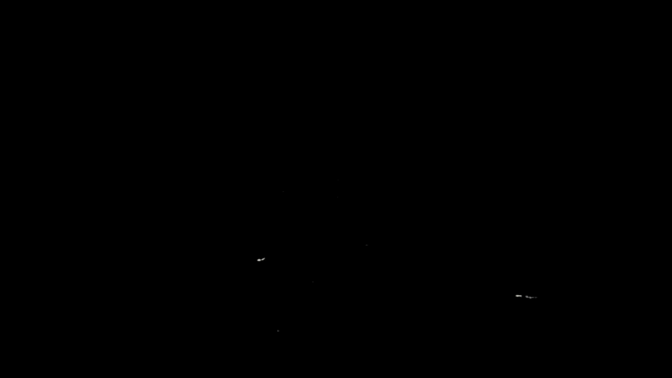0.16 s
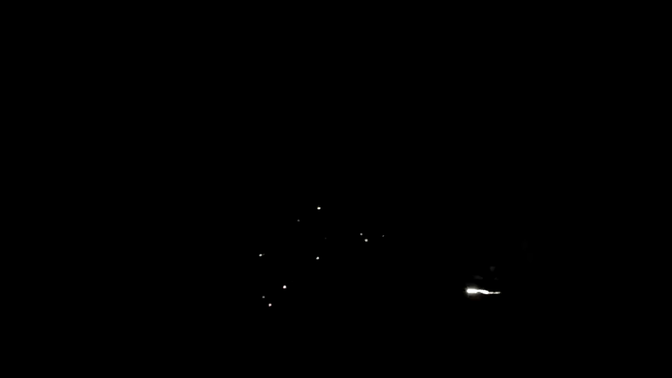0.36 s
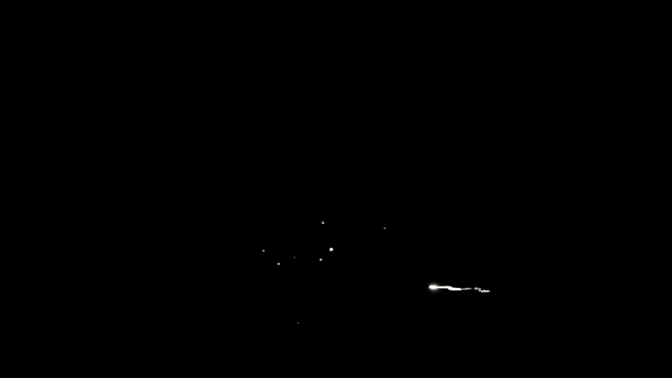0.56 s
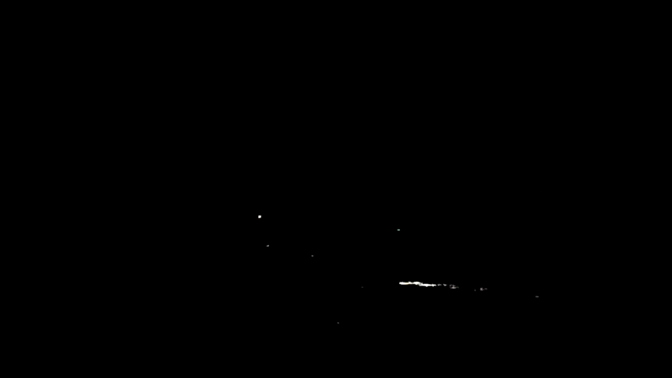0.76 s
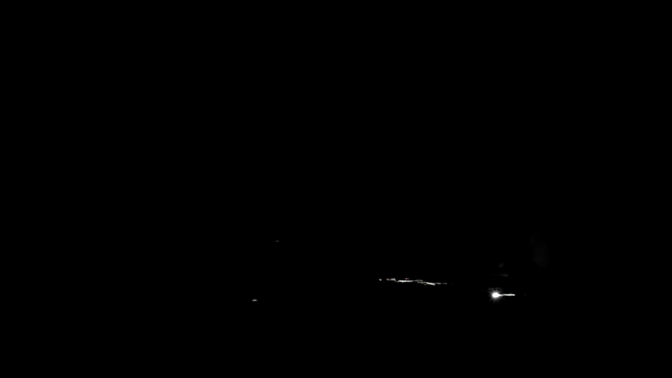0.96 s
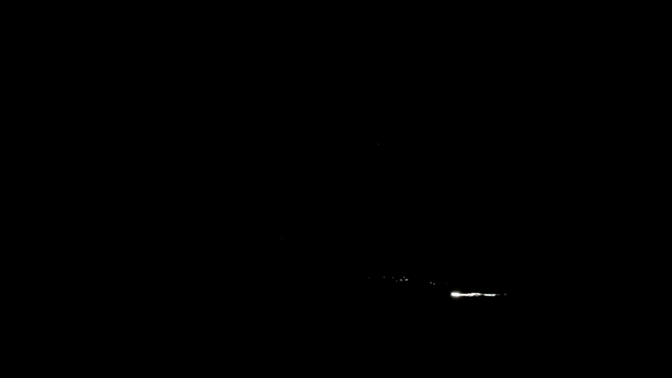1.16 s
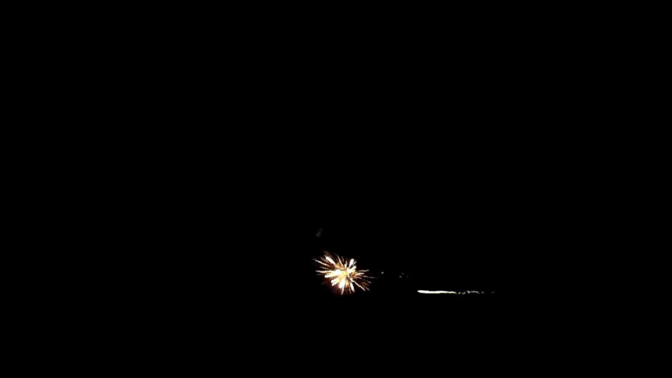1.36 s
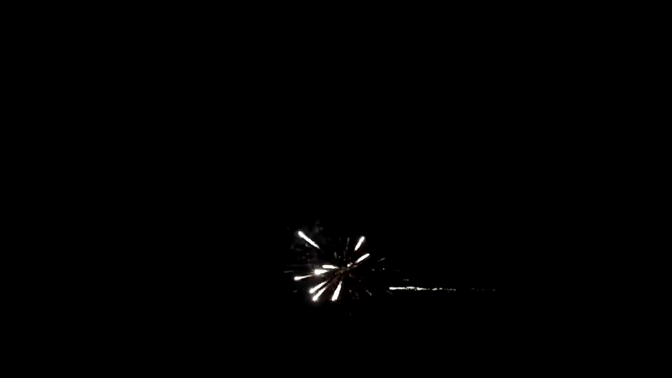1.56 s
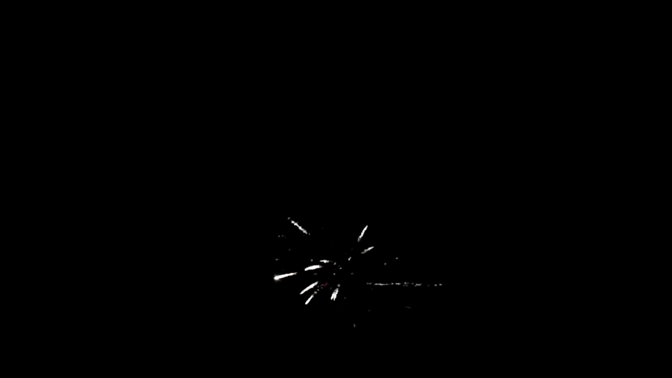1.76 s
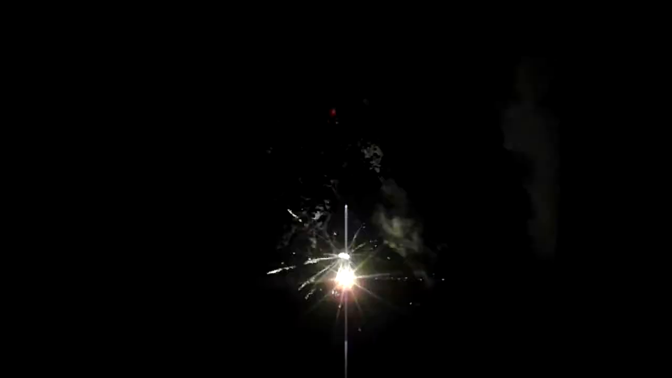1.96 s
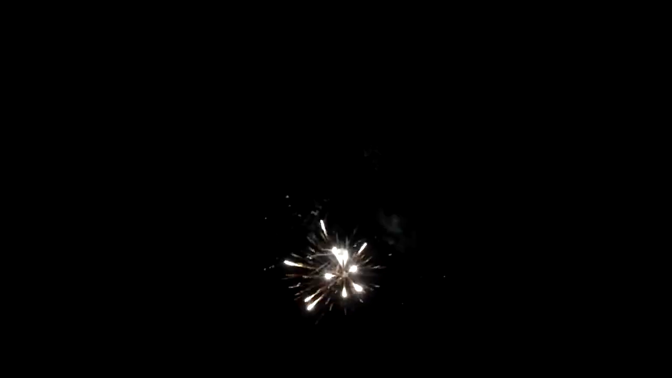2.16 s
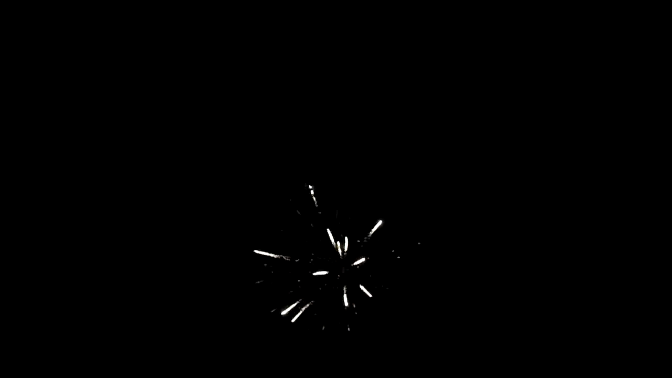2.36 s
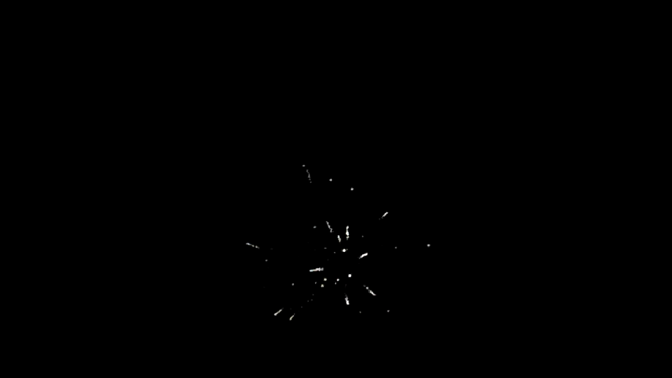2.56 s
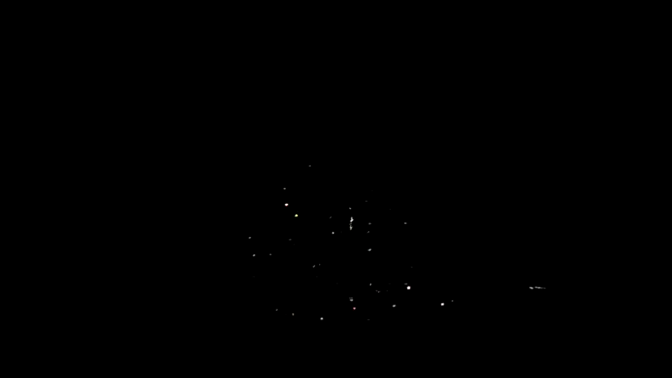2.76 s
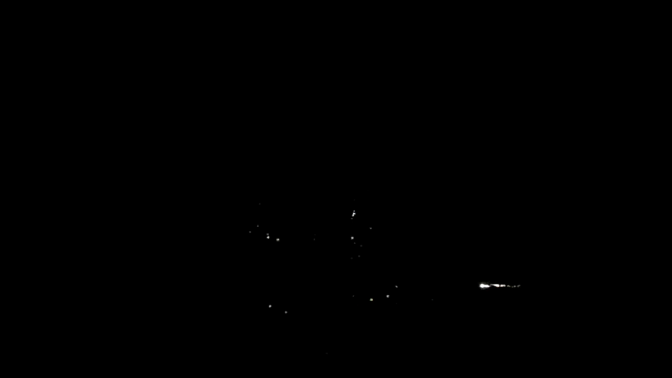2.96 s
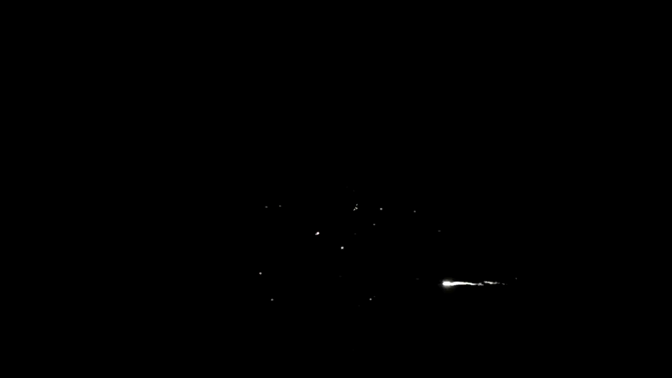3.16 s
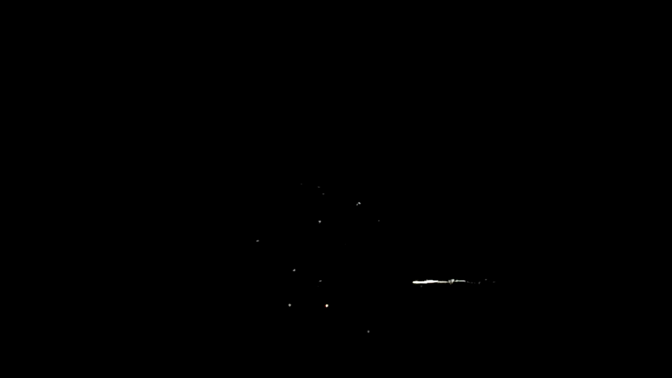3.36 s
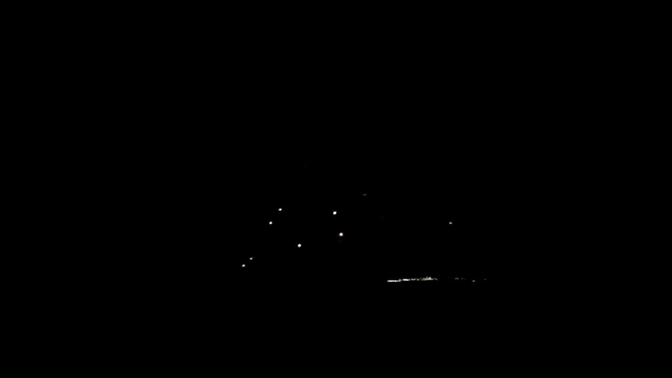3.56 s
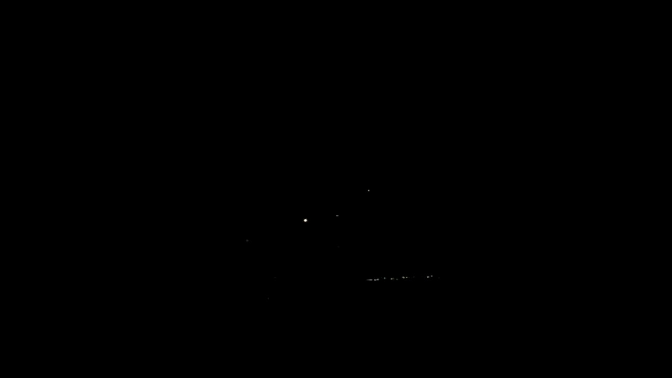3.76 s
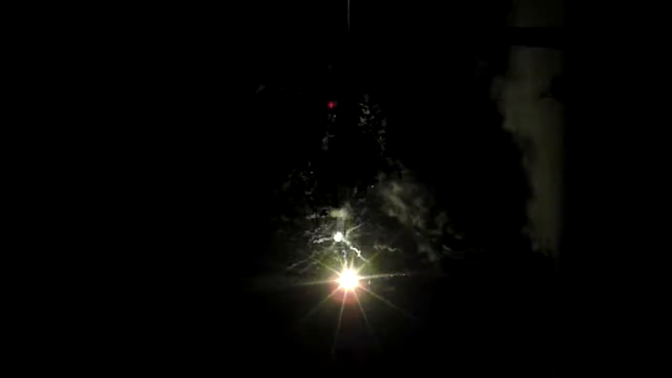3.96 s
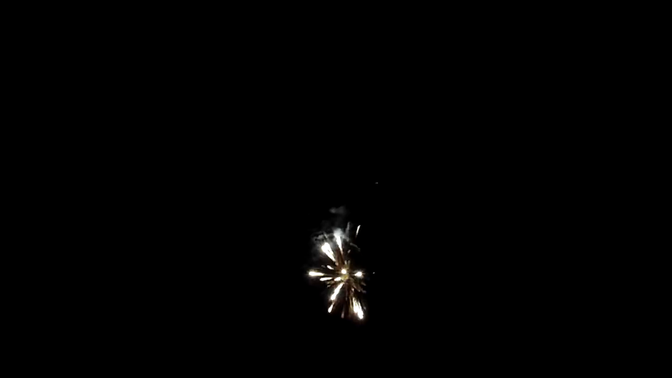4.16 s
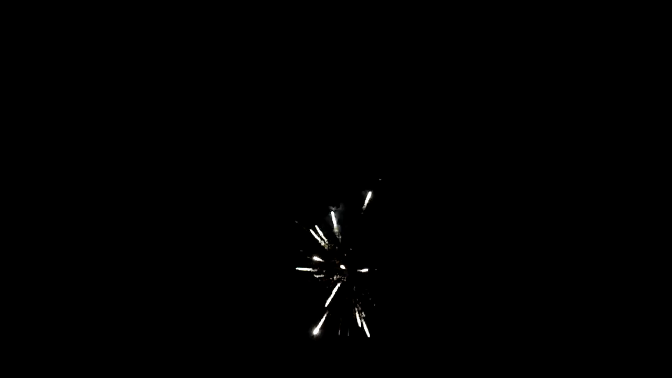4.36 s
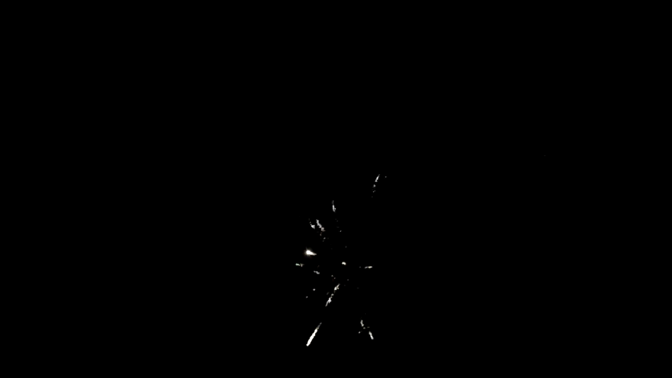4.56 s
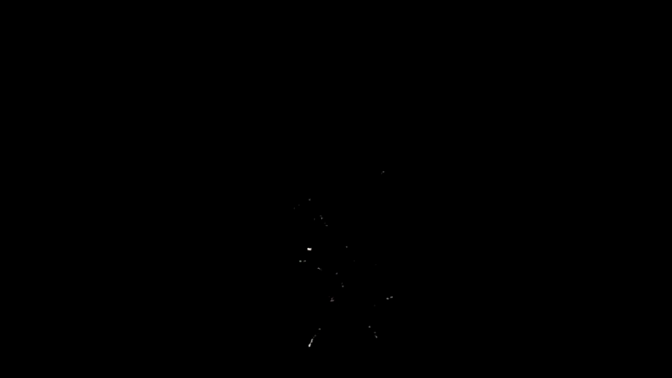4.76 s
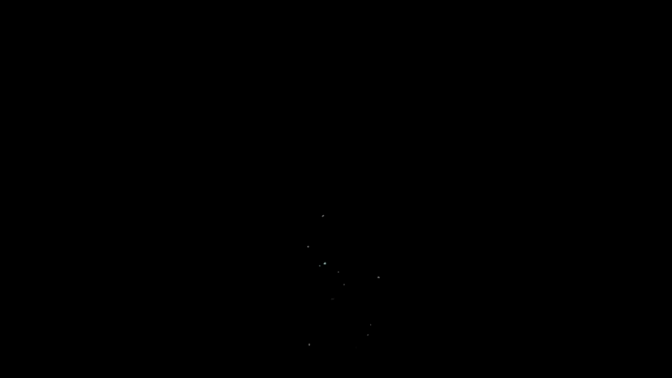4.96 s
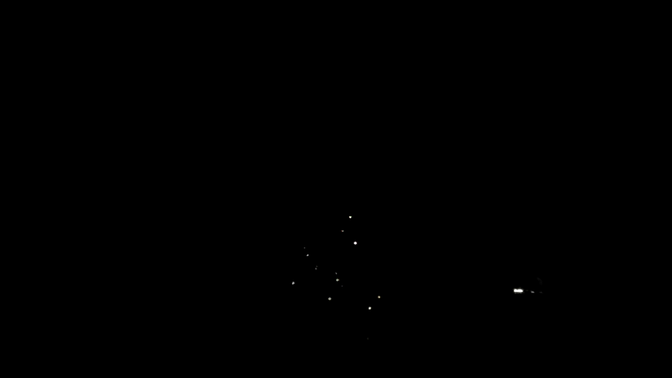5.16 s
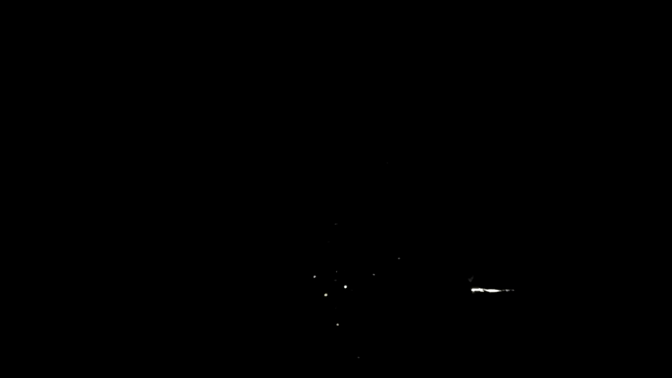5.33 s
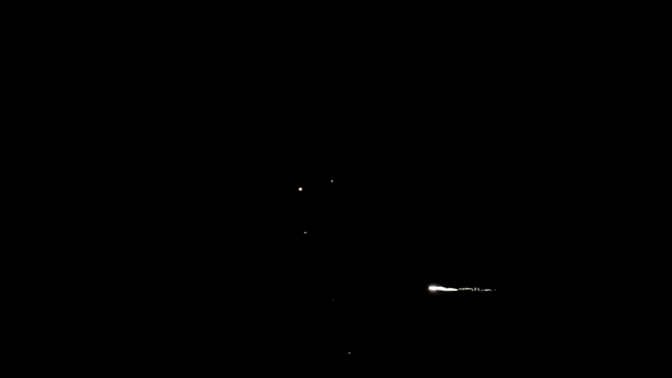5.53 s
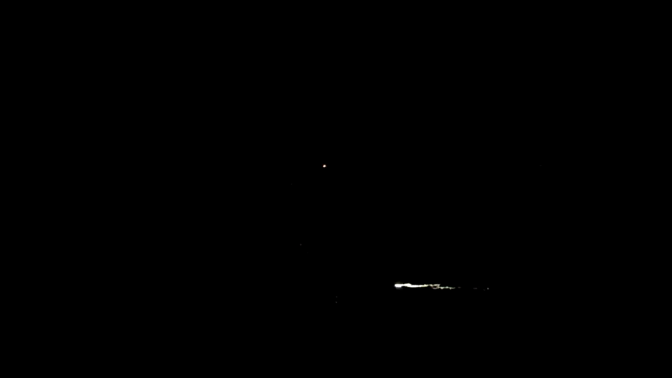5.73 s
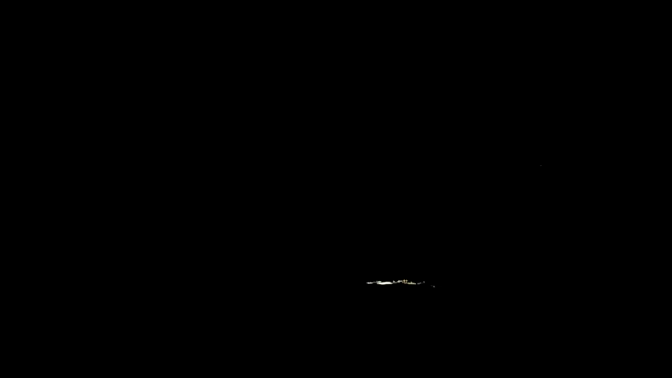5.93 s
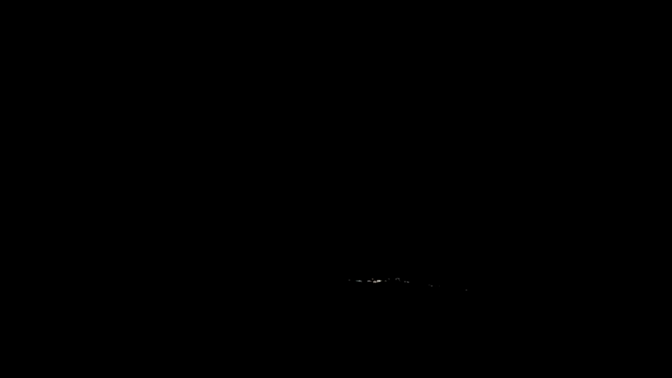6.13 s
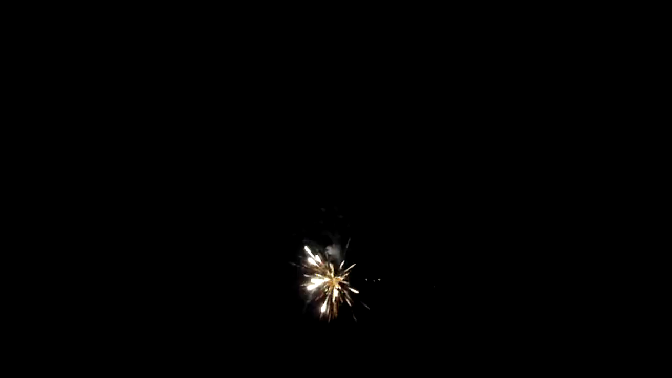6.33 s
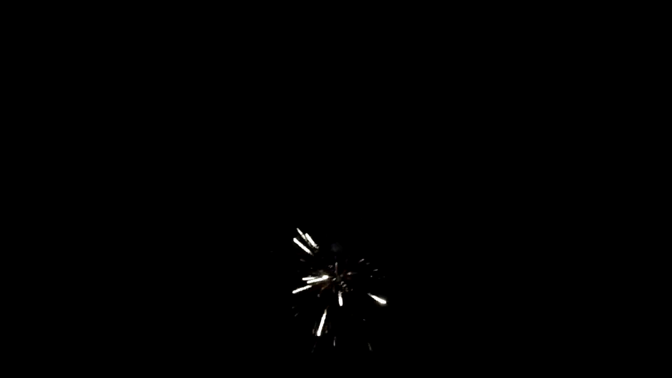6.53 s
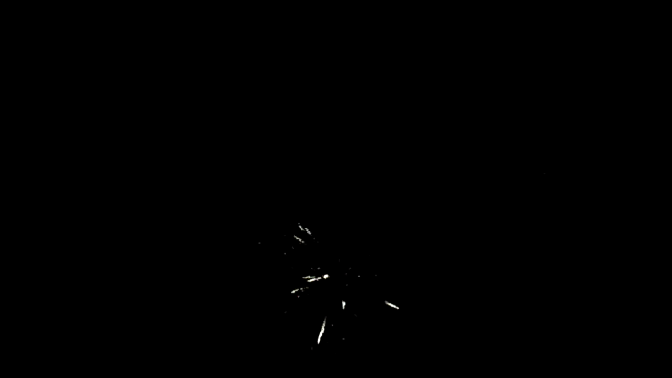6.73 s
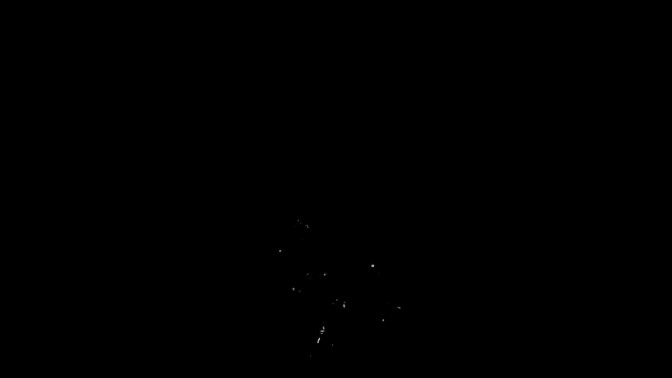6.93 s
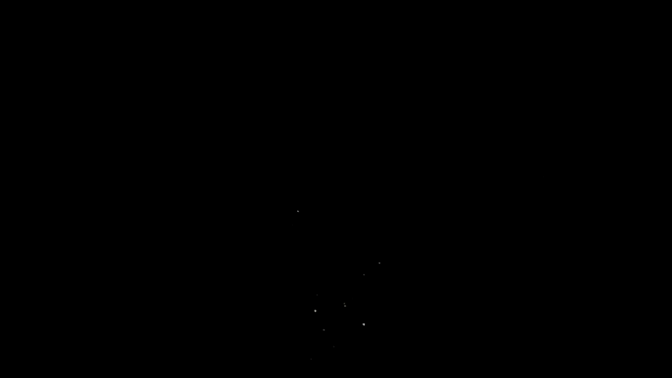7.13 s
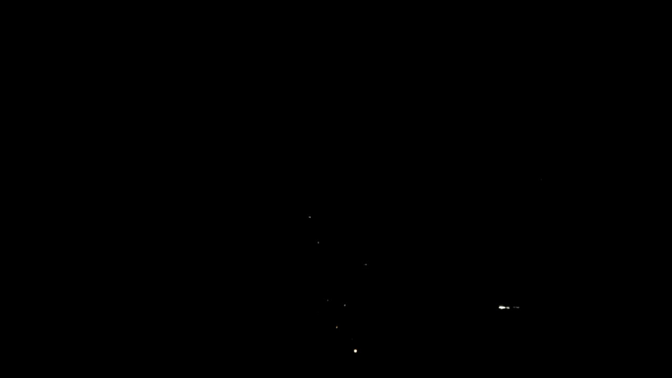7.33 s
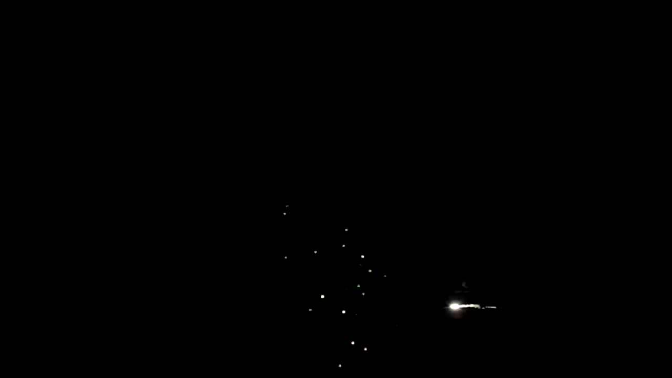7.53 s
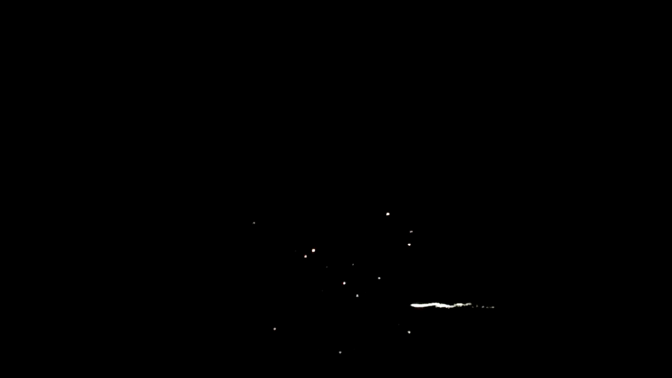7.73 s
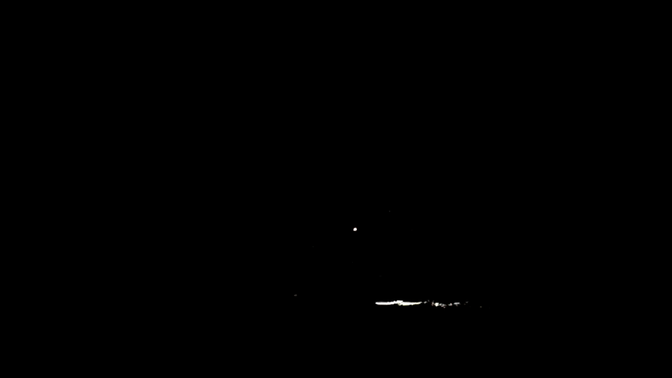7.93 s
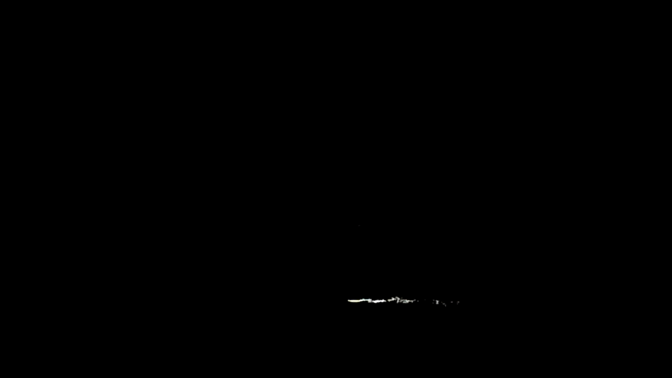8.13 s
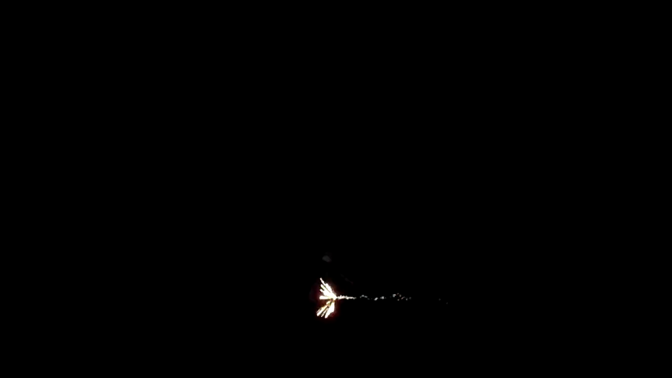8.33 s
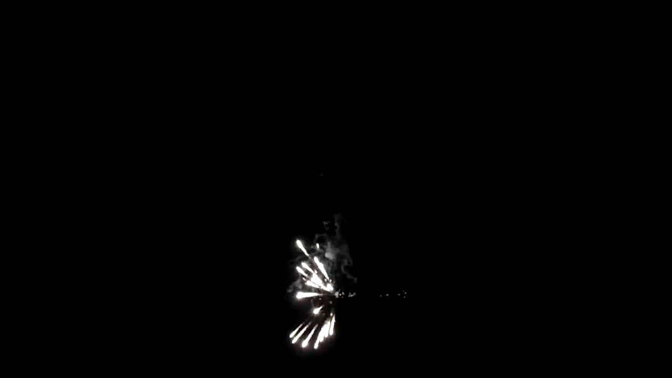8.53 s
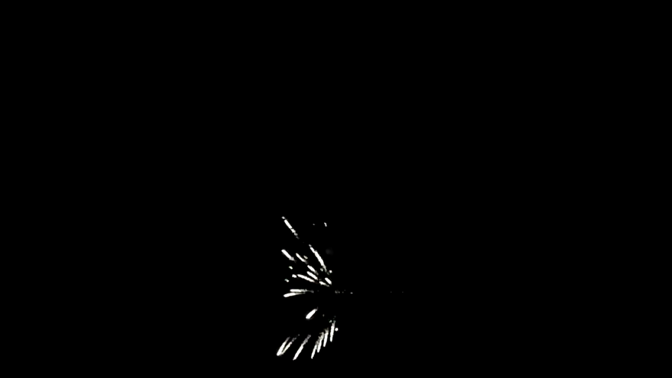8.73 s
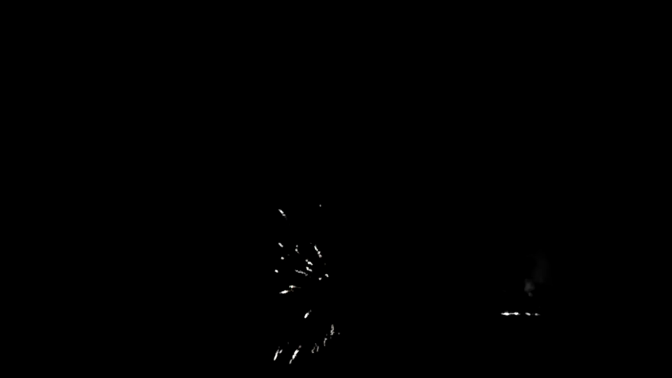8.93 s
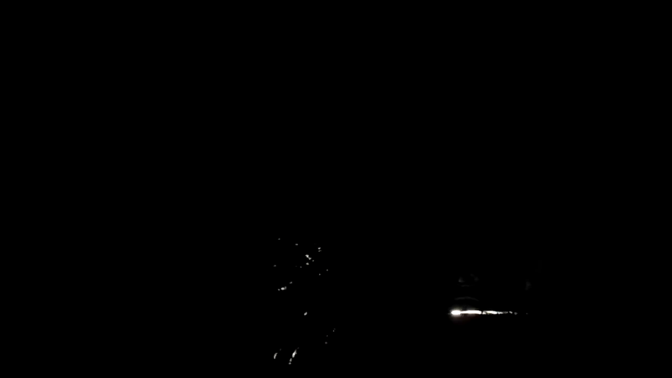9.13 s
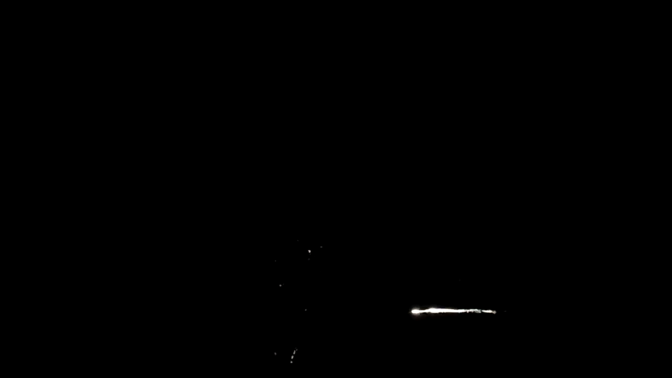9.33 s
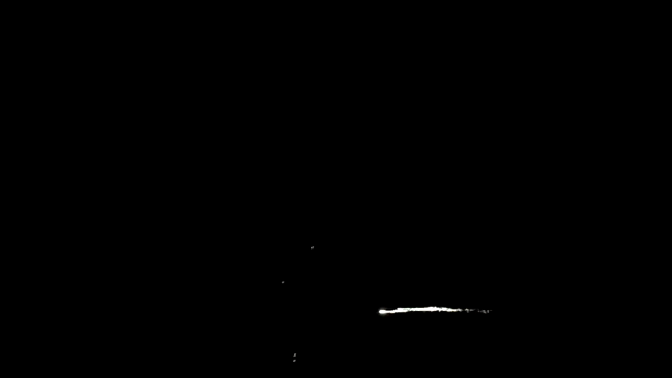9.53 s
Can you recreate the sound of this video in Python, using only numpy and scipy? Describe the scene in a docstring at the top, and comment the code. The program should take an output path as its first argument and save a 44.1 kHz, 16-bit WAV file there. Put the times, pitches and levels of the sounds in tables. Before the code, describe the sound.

A phone picks up a steady firework series: one bang almost at once, two dull launch thumps, two bangs close together, then thump and bang alternating to the end. The bangs are abrupt and overloaded, their echoes bright at first and then dull, lumpy and rolling. Single echoes knock back from buildings about a second later. Low traffic murmur and a faint early sizzle lie underneath, gated by noise suppression.

```python
"""Open ground ringed by far buildings, at night: firework shells, lobbed from a distant mortar, burst overhead.
Each blast is a sharp pressure push with nearby bounces that overloads a phone's microphones, then rolls back
from the surroundings for seconds as clumpy, dulling noise, with separate slaps off single buildings.
The mortar lifts are softer thumps with a crumble of scatter and a short tube ring. The phone's noise suppressor
shuts band after band, broadly treble first, as the rumble sinks toward murmur, a faint sizzle and hiss."""
import sys
import numpy as np
from scipy import signal
from scipy.io import wavfile
from scipy.ndimage import uniform_filter1d

SR = 44100
rng = np.random.default_rng(int(sys.argv[2]) if len(sys.argv) > 2 else 0)


def wav_out(sig):
    """Save sig, one row per channel (or a flat mono array), as 16-bit PCM at SR to the path in sys.argv[1]."""
    wavfile.write(sys.argv[1], SR, np.round(np.clip(np.atleast_2d(sig).T, -1, 1) * 32767).astype(np.int16))


N = 427322

# Shell bursts overhead. Each row: start in seconds, push level in dB before filtering, push length in ms,
# lateness of its slaps in ms, extra level of its slaps in dB, roll brightness in dB per octave above 1 kHz.
BURST_EVENTS = [(0.1364, 18, 0.89, 3.5, 0.5, 0.45), (2.391, 16, 0.81, 0.1, -9, 1),
                (3.088, 16.5, 0.69, -1.5, 0, -0.53), (5.0665, 17.5, 0.96, -2.5, 1.5, 0.2),
                (7.2997, 17.5, 0.98, 1.5, -4.5, 0.17), (9.379, 13.5, 0.95, 0.1, 0.1, 0.33)]
# Mortar lifts. Each row: start in seconds, relative level in dB, push length in ms,
# top of the scatter in Hz, tube ring in dB relative to the lift.
LIFT_EVENTS = [(1.166, -9, 0.45, 3600, -24), (1.8262, -9, 0.37, 2340, -44), (3.7598, -12, 0.59, 2570, -21),
               (6.1361, -11.5, 0.62, 3900, -15.5), (8.2561, -11, 1, 3440, -26)]
EARLIER_BURST_S = -1.76  # a burst before the start, of which only the echoes are heard


def undb(db):
    """Turn dB into an amplitude factor."""
    return 10 ** (np.asarray(db) / 20)


def shape(table, hz):
    """Read a table of (Hz, value) rows along a log-frequency axis."""
    f, value = np.transpose(table)
    return np.interp(np.log(np.maximum(hz, 1)), np.log(f), value)


def coloured(db_of, alike, size=512):
    """Two-channel noise whose dB per Hz follows db_of(Hz, s); alike is the share of power common to both sides."""
    common, own = rng.standard_normal(N), rng.standard_normal((2, N))
    alike = np.clip(alike, 0, 1)
    white = np.sqrt(alike) * common + np.sqrt(1 - alike) * own
    hz, s, z = signal.stft(white, SR, nperseg=size)
    z = z * undb(db_of(hz[:, None], s[None, :]))
    return np.sqrt(SR / 2) * signal.istft(z, SR, nperseg=size)[1][:, :N]


def walk(rate):
    """Random levels, a new one every 1 / rate s, joined by straight slews; spread a little under 1."""
    hold = int(SR / rate)
    steps = np.repeat(rng.standard_normal(N // hold + 1), hold)
    return 1.08 * uniform_filter1d(steps, hold)[:N]


def blast(s, push_ms, pull):
    """A sudden push of air that sinks through zero into a longer pull; the microphone reads it upside down."""
    t = np.maximum(s, 0) * 1000 / push_ms
    return (s >= 0) * (t - 1) * np.exp(-pull * t)


def bursts():
    """The blast arrives direct and again off the ground, a wall close by and the far side of the yard."""
    ground_s, wall_s, yard_s = 0.00205, 0.00415, 0.0113
    yard_db = -12
    out, t = np.zeros(N), np.arange(N) / SR
    for s, db, push, *_ in BURST_EVENTS:
        near = slice(int(s * SR) - 9, int(s * SR) + 2000)
        u = t[near] - s
        direct = blast(u, push, 0.91)
        ground = 2.2 * blast(u - ground_s, push, 1.18)
        wall = 1.37 * blast(u - wall_s, 2.6 * push, 2.55)
        yard = undb(yard_db) * blast(u - yard_s, 1.06 * push, 0.89)
        out[near] += undb(db) * (direct + ground + wall + yard)
    return signal.sosfilt(signal.butter(2, 2200, fs=SR, output="sos"), out)


def answer(age):
    """Power the surroundings send back, age s after a blast: a steady fade that swells at built-up stretches."""
    roll_db, roll_db_per_s = -33, -10.5
    # Each row: time after the blast in seconds, relative level in dB, rise in seconds, fall in seconds.
    swell_rows = [(0.36, -39, 0.099, 0.044), (0.59, -39, 0.019, 0.057), (0.9, -37, 0.1, 0.066),
                  (1.05, -43, 0.057, 0.053), (1.25, -45.5, 0.017, 0.086), (1.75, -44, 0.01, 0.16),
                  (2.05, -50.5, 0.16, 0.31)]
    power = undb(roll_db + roll_db_per_s * age) ** 2
    for s, db, rise, fall in swell_rows:
        width = np.where(age < s, rise, fall)
        power = power + undb(db) ** 2 * np.exp(-((age - s) / width) ** 2 / 2)
    return (age >= 0) * power


def roll():
    """Countless echoes: bright and strong from near things, duller as they come from further off."""
    # Echoes from near things. Each row: frequency in Hz, relative density in dB per Hz.
    near_colour = [(30, -37), (100, -18), (200, -20), (300, -31.5), (500, -24), (900, -34), (1400, -34.5),
                   (2000, -36.5), (3000, -39.5), (4500, -46), (7000, -54), (11500, -48.5)]
    # Far echoes, dulled by the long path through air. Each row: frequency in Hz, relative density in dB per Hz.
    far_colour = [(30, -32), (100, -34.5), (200, -28), (300, -32), (450, -25), (650, -26), (900, -32),
                  (1300, -36.5), (1800, -40.5), (2400, -45.5), (3000, -56), (4000, -58.5), (6000, -66),
                  (11500, -100)]
    # Pace of the change from near to far colour. Each row: frequency in Hz, time constant in seconds.
    ageing = [(100, 0.039), (300, 0.13), (2000, 0.9), (4000, 0.49), (9000, 0.63)]
    lift_roll_db = -18.5  # the lifts' roll relative to the bursts'

    t = np.arange(N) / SR
    starts = np.array([EARLIER_BURST_S] + [row[0] for row in BURST_EVENTS])
    bright = np.array([0] + [row[5] for row in BURST_EVENTS])

    def latest(s):
        return np.searchsorted(starts, s, "right") - 1

    def age(s):
        return s - starts[latest(s)]

    def echo_db(hz, s):
        young = np.exp(-age(s + 0.0049) / np.maximum(shape(ageing, hz), .02))
        colour = shape(far_colour, hz) + (shape(near_colour, hz) - shape(far_colour, hz)) * young
        # the air keeps eating treble on the longest paths
        air = 2.5 * hz / 1000 * np.clip(age(s) - .95, 0, .6)
        tilt = bright[latest(s)] * np.log2(np.maximum(hz, 1000) / 1000)
        return colour - air + tilt

    echoes = coloured(echo_db, 1.0)
    coarse = t[::64]
    burst_power = sum(answer(coarse - s) for s in starts)
    lift_power = undb(lift_roll_db) ** 2 * sum(answer(coarse - row[0]) for row in LIFT_EVENTS)
    level = np.interp(t, coarse, np.sqrt(burst_power + lift_power))
    # the first walls answer loudly within a tenth of a second, once the blast itself has passed
    first_db = 14 * np.exp(-age(t) / 0.092) + 10 * np.exp(-age(t) / 0.0079)
    onset = np.clip((age(t) - .003) / 0.0027, 0, 1)
    lumps_db = 1.52 * walk(120) + 0.6 * walk(20)  # echoes come in clumps
    return onset * level * undb(first_db + lumps_db) * echoes


def slaps():
    """Every building answers every burst after its own delay, a little louder or softer each time."""
    # Single buildings. Each row: delay after the burst in seconds, relative level in dB.
    buildings = [(0.442, -24), (0.848, -16), (0.909, -13.5), (1.218, -25), (1.257, -22.5), (1.742, -31.5),
                 (1.799, -22)]
    scatter_db, push_ms = 1, 0.58
    heard = [(EARLIER_BURST_S, 0)]
    heard += [(s + late / 1000, db) for s, _, _, late, db, _ in BURST_EVENTS]
    chance_db = scatter_db * rng.standard_normal((len(heard), len(buildings)))
    hits = []
    for (s, extra_db), chances in zip(heard, chance_db):
        for (lag, db), chance in zip(buildings, chances):
            hits.append((s + lag, db + extra_db + chance))
    hits.append((2.139, -22))  # a dull pop from somewhere far off
    # scatter up to 2200 Hz, practically no tube ring
    return [(s, db, push_ms, 2200, -99) for s, db in hits if 0 < s < N / SR - .01]


def thumps(table, gain_db, dull_hz, bounce, lag_ms, crumble_db, crumble_s):
    """Distant blasts with one bounce, rounded by the air, each trailing a crumble of scatter and a tube ring."""
    tube_hz, tube_ring_s = 2440, 0.0012
    pushes, rest, t = np.zeros(N), np.zeros(N), np.arange(N) / SR
    chance = rng.standard_normal(N)
    for s, db, push, top_hz, ring_db in table:
        near = slice(int(s * SR), int((s + .2) * SR))
        u = t[near] - s
        pushes[near] += undb(db) * (blast(u, push, 1.0) + bounce * blast(u - lag_ms / 1000, push, 0.98))
        scatter = signal.butter(5, [400, top_hz], "band", fs=SR, output="sos")
        crumble = undb(crumble_db) * signal.sosfilt(scatter, chance[near] * np.exp(-u / crumble_s))
        swell = (u / tube_ring_s) * np.exp(1 - u / tube_ring_s)
        ring = undb(ring_db) * np.sin(2 * np.pi * tube_hz * u) * swell
        rest[near] += undb(db) * (crumble + ring)
    pushes = signal.sosfilt(signal.butter(2, [230, dull_hz], "band", fs=SR, output="sos"), pushes)
    pushes = signal.sosfilt(signal.butter(2, 0.71 * dull_hz, fs=SR, output="sos"), pushes)
    return undb(gain_db) * (pushes + rest)


def night():
    """Far traffic murmur, a fading sizzle, and faint microphone hiss, nearly unrelated left and right."""
    # Traffic murmur. Each row: frequency in Hz, relative density in dB per Hz.
    murmur_colour = [(30, -85), (60, -73.5), (100, -65.5), (200, -82.5), (300, -84.5), (450, -78),
                     (650, -89.5), (900, -74), (1300, -79.5), (2000, -86.5), (3000, -91), (5000, -102),
                     (11500, -115)]
    # Microphone hiss. Each row: frequency in Hz, density in dB per Hz.
    hiss_colour = [(30, -102), (300, -88), (2000, -92), (5000, -90.5), (11500, -88)]
    # A faint treble sizzle, perhaps burning stars. Each row: time in seconds, density in dB per Hz at 4.5 kHz.
    fizz_levels = [(0, -85), (1.5, -86), (2.3, -88.5), (3, -105), (9.7, -105)]

    def fizz_db(hz, s):
        return np.interp(s, *np.transpose(fizz_levels)) - 9 * np.log2((hz + 1) / 4500) ** 2

    murmur = coloured(lambda hz, s: shape(murmur_colour, hz) + 0 * s, 0.95, size=2048)
    murmur = murmur * undb([[.8], [-.8]])  # louder on the left
    fizz = coloured(fizz_db, 0.58, size=2048)
    hiss = coloured(lambda hz, s: shape(hiss_colour, hz) + 0 * s, 0.14, size=2048)
    return murmur + fizz + hiss


def scene():
    """Everything reaches the right port a little earlier; far sounds are louder on the left."""
    far = roll()
    far = far + thumps(LIFT_EVENTS, gain_db=4.6, dull_hz=1450, bounce=-1.48, lag_ms=2.97,
                       crumble_db=-22.5, crumble_s=0.039)
    far = far + thumps(slaps(), gain_db=2.7, dull_hz=1420, bounce=1.0, lag_ms=2.08,
                       crumble_db=-16, crumble_s=0.012)
    sound = far * undb([[.65], [-.65]]) + night() + bursts()
    delay = np.sinc(np.arange(-8, 12) - 1.6) * np.hanning(20)  # 1.6 samples
    left = np.convolve(sound[0], delay)[8:N + 8]
    return np.array([left, sound[1]])


def suppress(x, size=1024):
    """Each band is turned down while its level stays under a threshold; it opens at once and closes slowly."""
    # Edges of the suppressor's bands in Hz.
    edges = [0, 120, 170, 250, 340, 430, 520, 650, 770, 920, 1080, 1270, 1460, 1700, 2000, 2320, 2700, 3100,
             3500, 4000, 4700, 5500, 6500, 7700, 9500, 23000]
    # Opening thresholds. Each row: frequency in Hz, level in dB per Hz.
    thresholds = [(50, -99), (200, -94), (300, -75.5), (450, -85.5), (700, -74.5), (900, -78.5),
                  (1350, -81.5), (1580, -79.5), (2000, -79.5), (2500, -83.5), (2900, -83.5), (4500, -82),
                  (10000, -81)]
    depth_db, soft_db, close_s, smooth_s = 13.5, 1.48, 0.03, 0.016
    overlap = size - size // 4
    hz, s, z = signal.stft(x, SR, nperseg=size, noverlap=overlap)
    hop_s = s[1] - s[0]
    band = np.searchsorted(edges, hz, "right") - 1
    member = band[None, :] == np.arange(len(edges) - 1)[:, None]
    power = member @ np.mean(abs(z) ** 2, axis=0) / member.sum(axis=1, keepdims=True)
    power = power * size * 4 / 3 / SR  # per Hz
    keep = np.exp(-hop_s / smooth_s)
    # the 80 dB offset makes the smoothing start from -80 dB
    db = signal.lfilter([1 - keep], [1, -keep], 10 * np.log10(power + 1e-18) + 80) - 80
    centre = member @ hz / member.sum(axis=1)
    over = db - shape(thresholds, centre)[:, None]
    openness = 1 / (1 + np.exp(-np.clip(over / soft_db, -30, 30)))
    keep = np.exp(-hop_s / close_s)
    for i in range(1, len(s)):
        openness[:, i] = np.maximum(openness[:, i], keep * openness[:, i - 1])
    gain = undb(-depth_db * (1 - openness))[band]
    return signal.istft(z * gain, SR, nperseg=size, noverlap=overlap)[1][:, :N]


def record(dry):
    """Capsules saturate and dull, the coupling drains flat tops, the suppressor acts, the converter clips."""
    # Level at which each capsule saturates, left then right, as a share of full scale before the filters.
    ceiling = (0.86, 1)
    top = np.array(ceiling)[:, None]
    x = dry / (1 + abs(dry / top) ** 4) ** .25
    x = signal.sosfilt(signal.butter(1, 6330, fs=SR, output="sos"), x)  # capsule dullness
    x = signal.sosfilt(signal.butter(1, 269, "high", fs=SR, output="sos"), x)  # coupling
    x = signal.sosfilt(signal.butter(2, 72, "high", fs=SR, output="sos"), x)
    x = np.clip(suppress(x), -.95, .95)
    # steep treble limit at 11.6 kHz
    return signal.sosfilt(signal.ellip(12, .2, 80, 11600, fs=SR, output="sos"), x)


dry = scene()
out = record(dry)
wav_out(out)
```